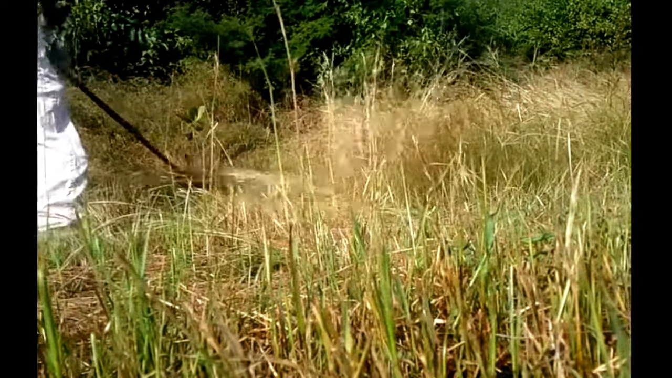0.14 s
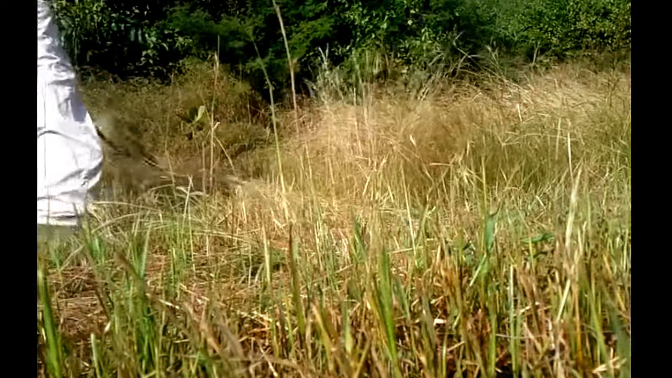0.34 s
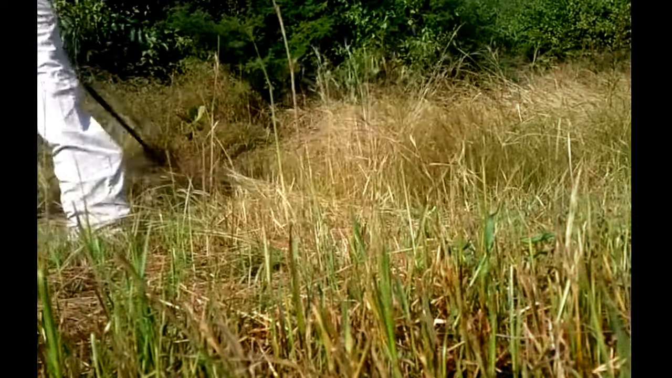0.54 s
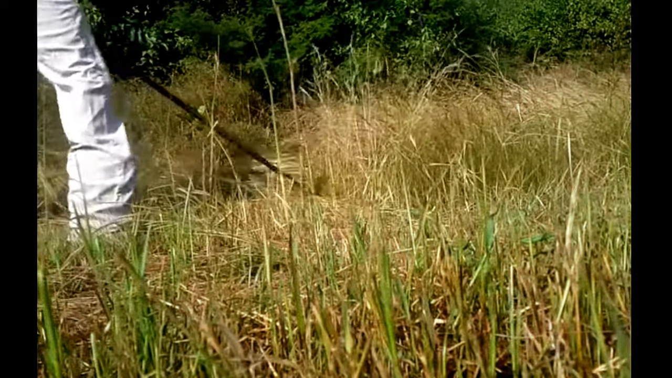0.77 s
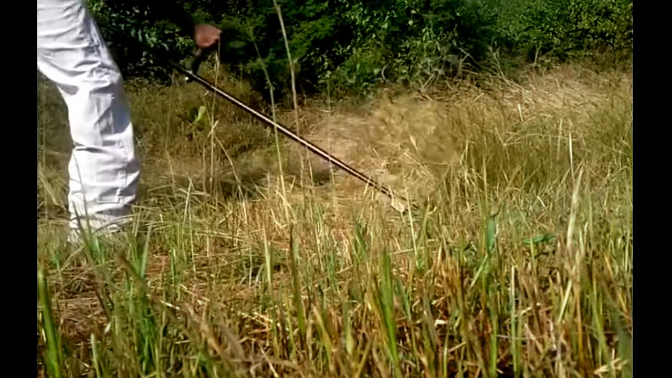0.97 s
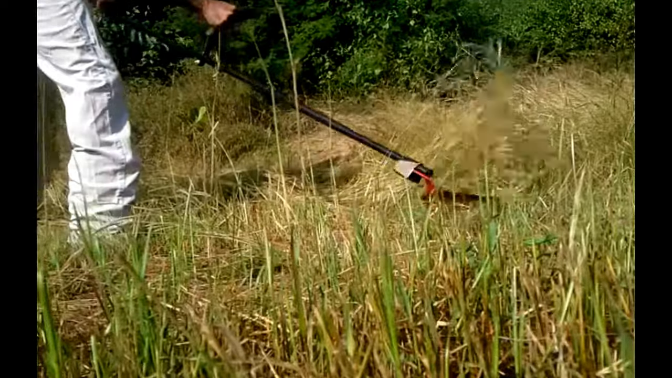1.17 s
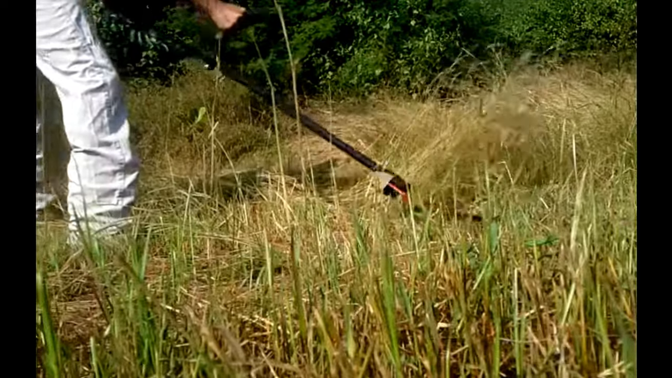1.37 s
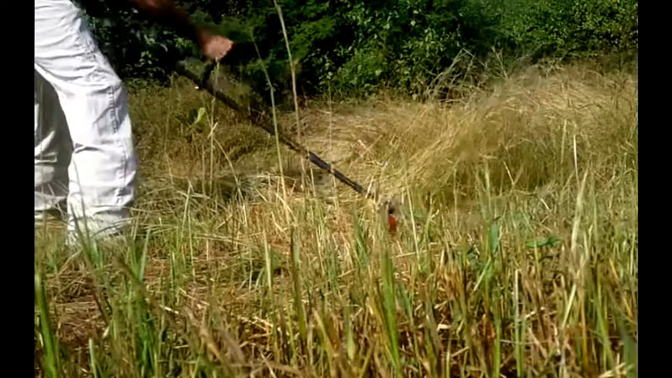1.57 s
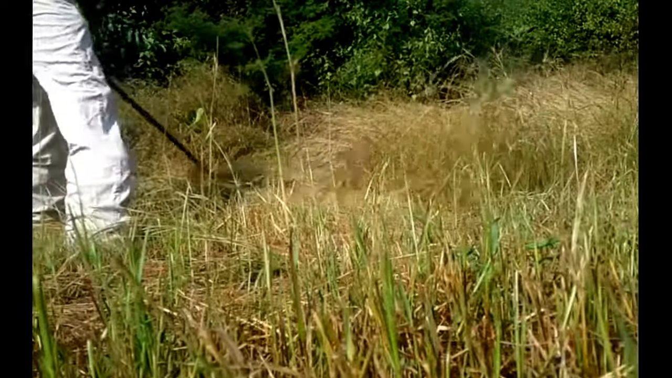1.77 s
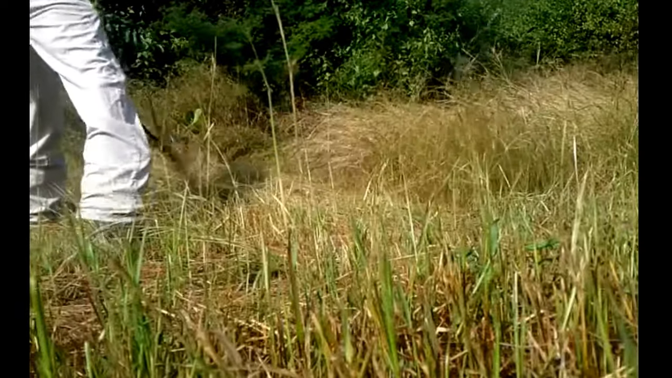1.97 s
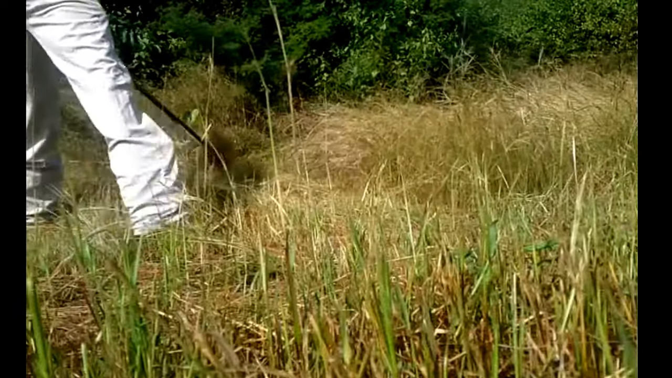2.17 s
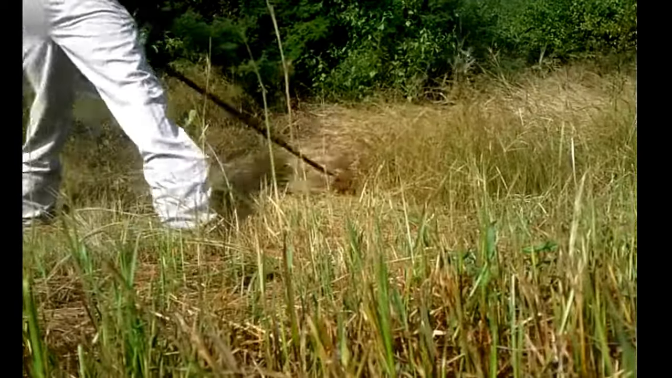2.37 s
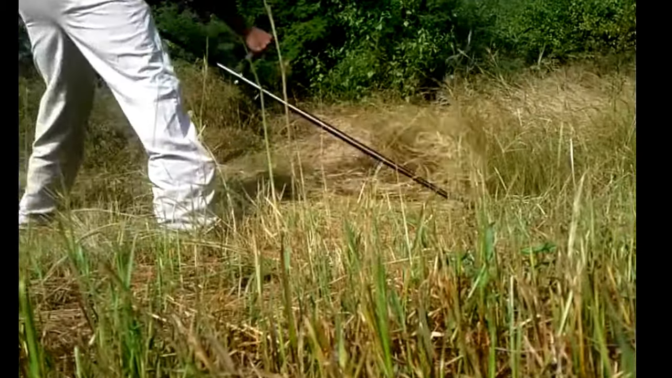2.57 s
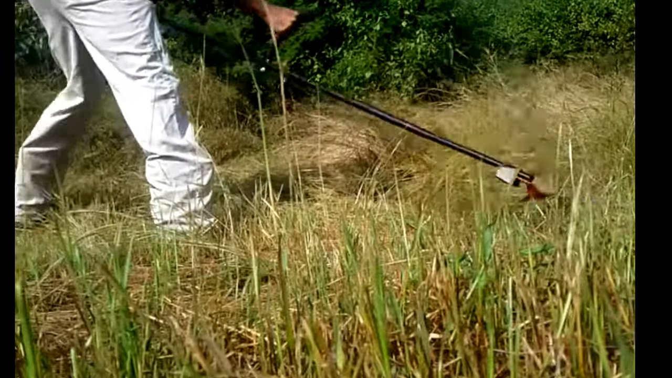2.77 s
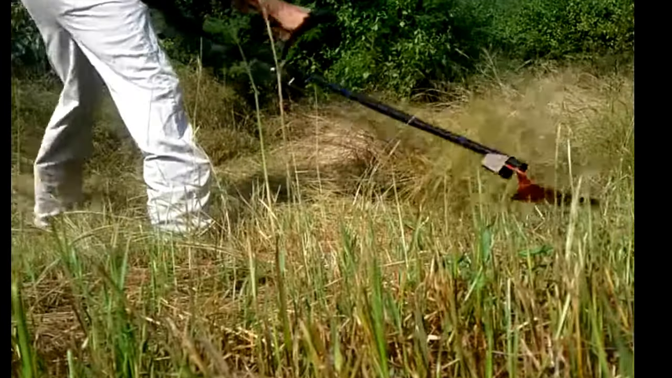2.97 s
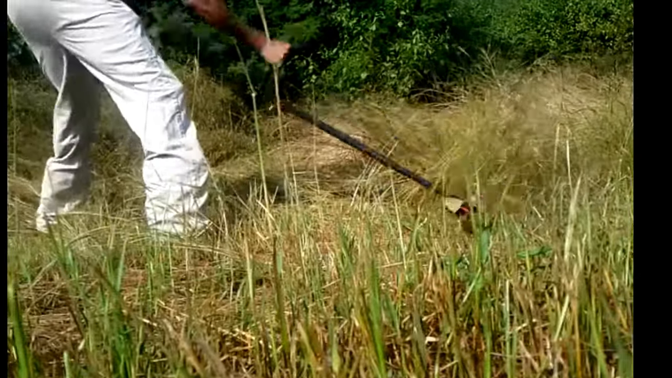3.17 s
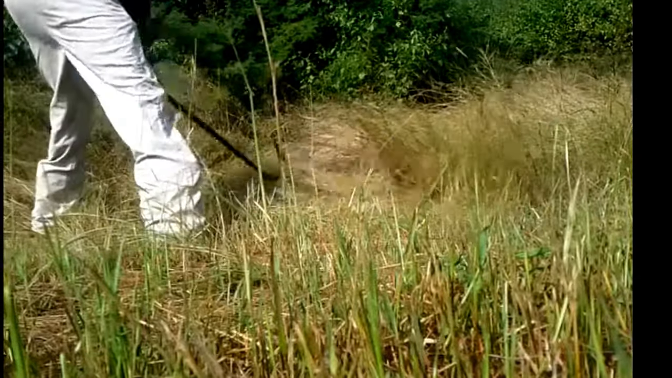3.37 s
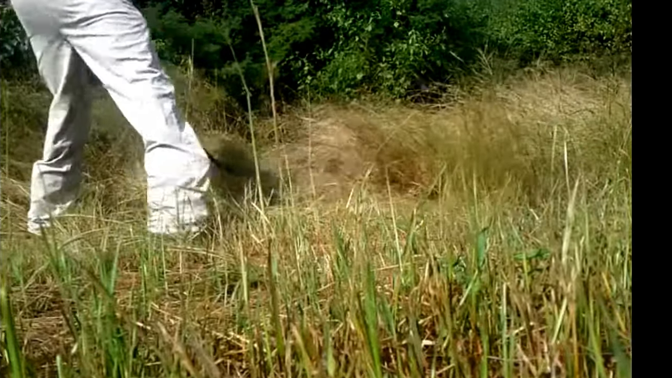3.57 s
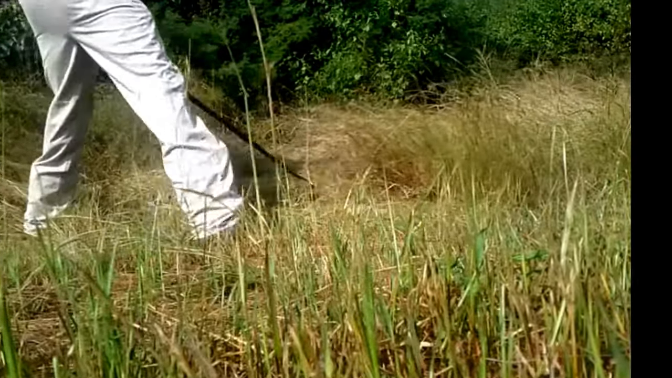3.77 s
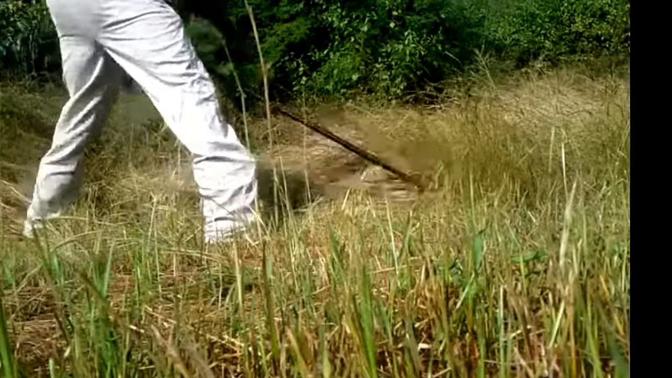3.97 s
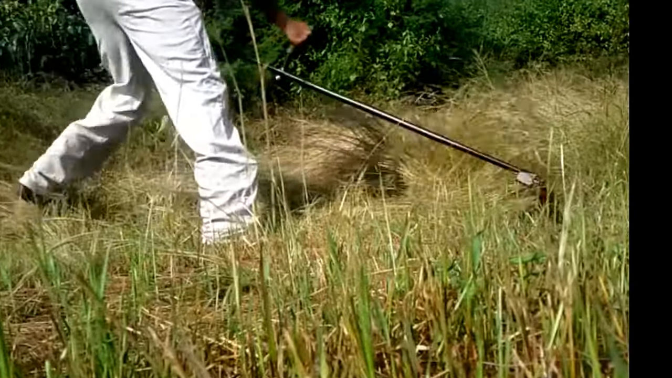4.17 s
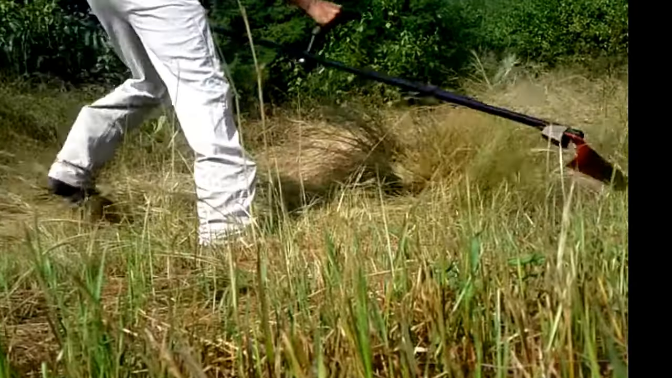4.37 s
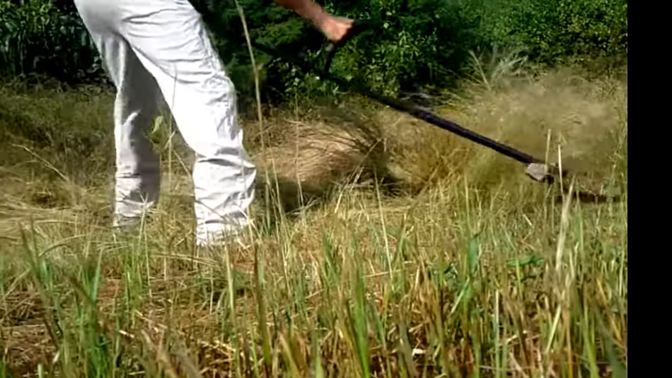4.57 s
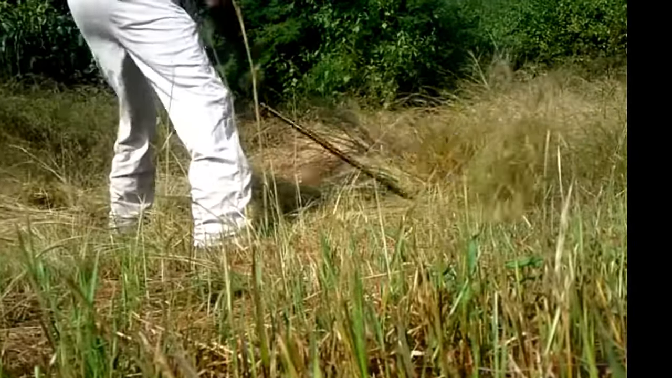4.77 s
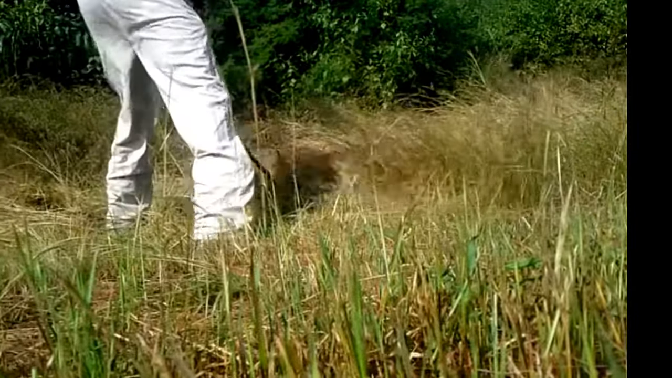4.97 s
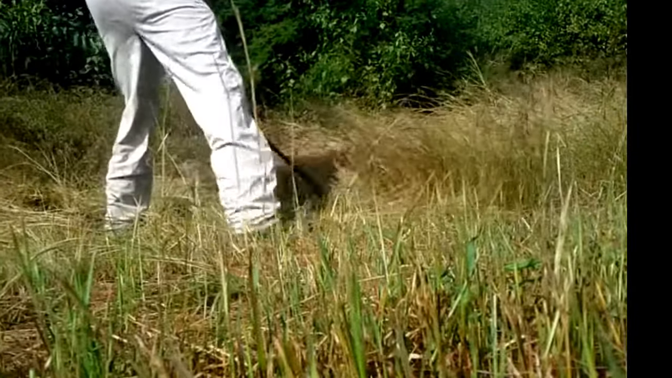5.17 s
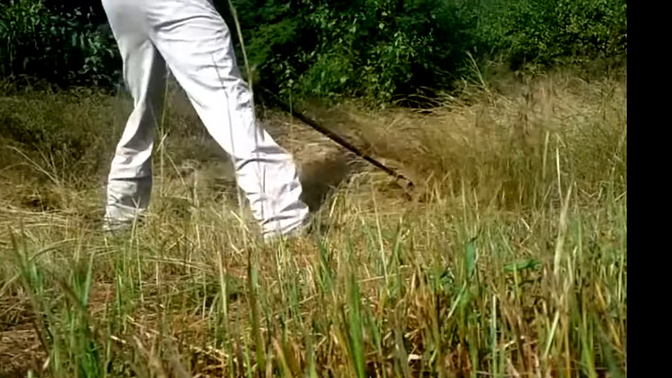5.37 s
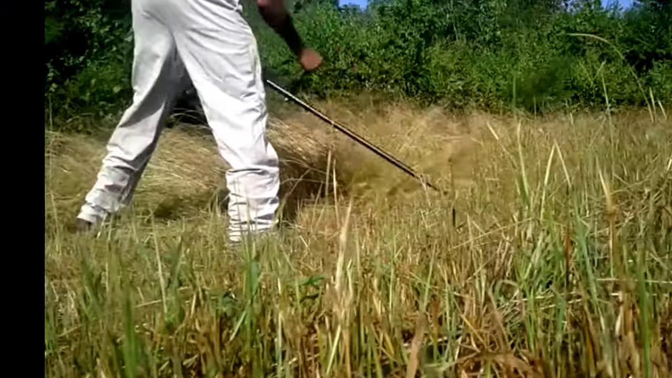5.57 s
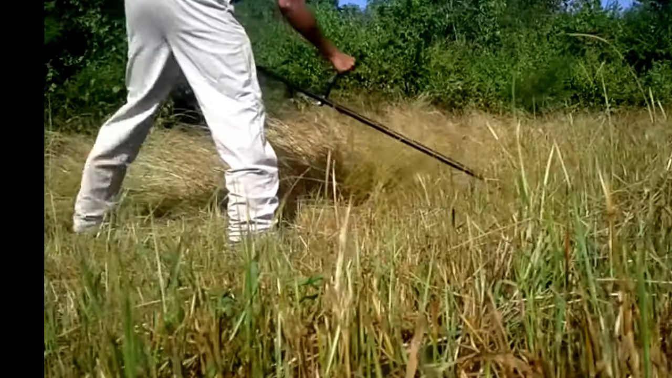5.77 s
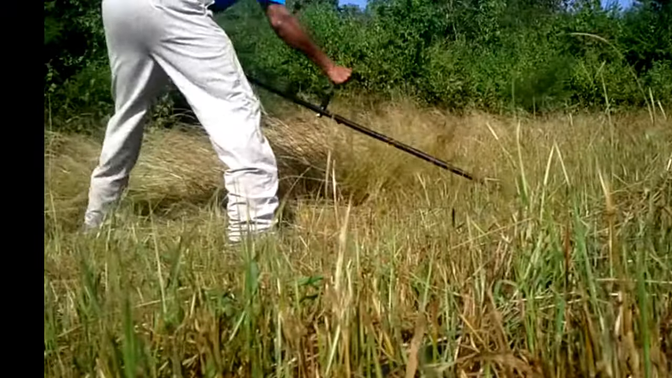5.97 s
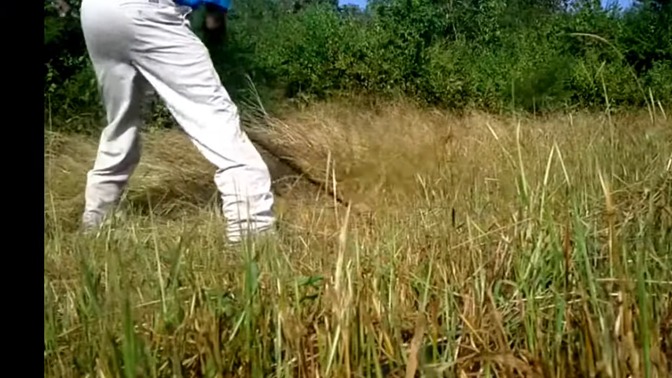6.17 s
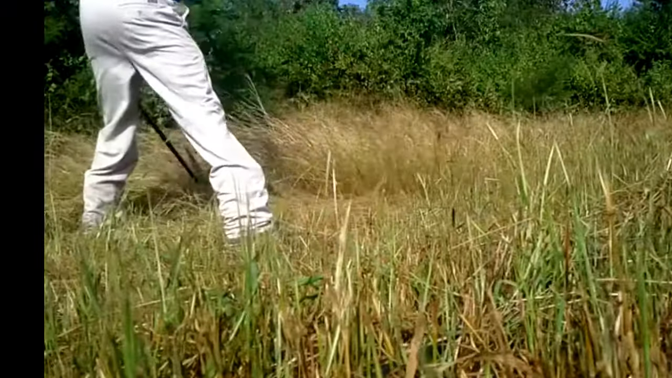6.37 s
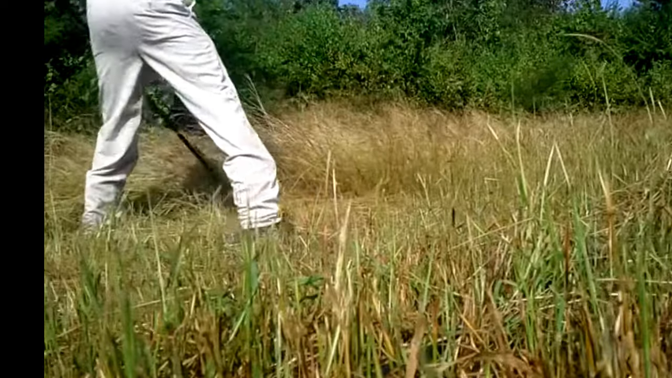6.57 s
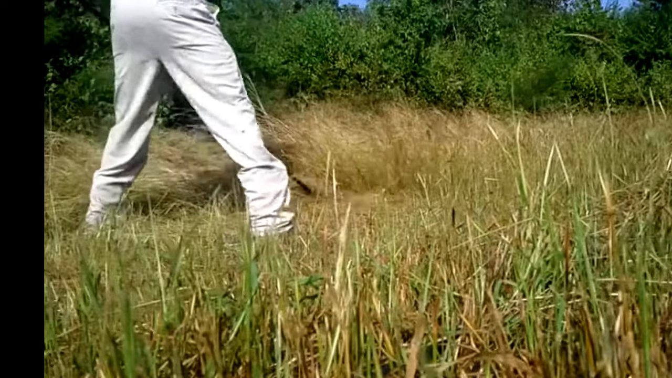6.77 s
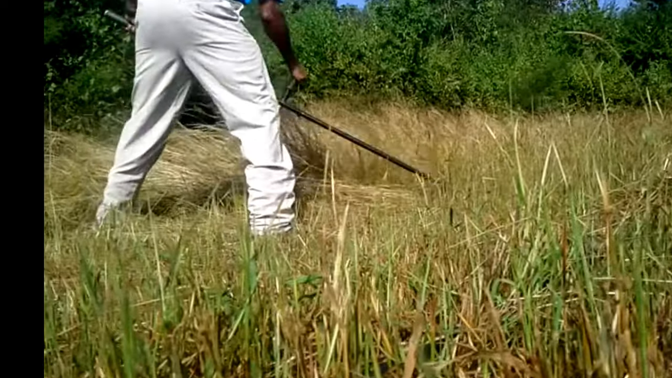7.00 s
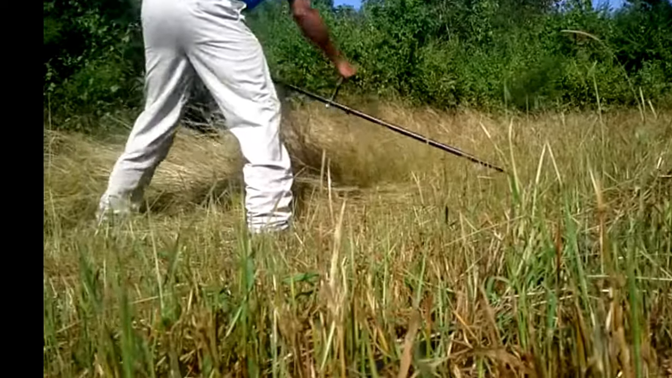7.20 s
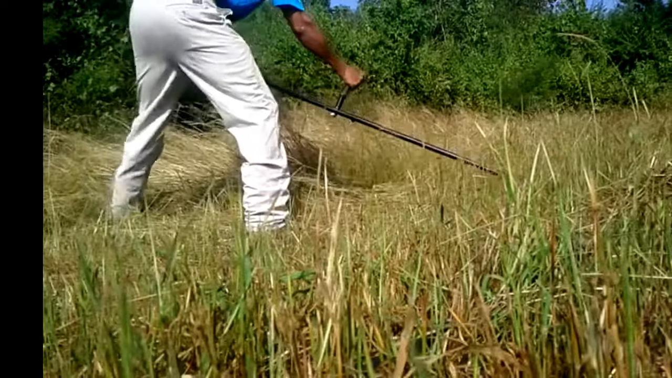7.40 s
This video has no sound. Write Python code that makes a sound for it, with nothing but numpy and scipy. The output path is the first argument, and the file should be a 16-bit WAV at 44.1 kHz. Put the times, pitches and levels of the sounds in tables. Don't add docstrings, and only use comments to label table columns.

```python
import sys
import numpy as np
from scipy import signal
from scipy.fft import rfft, irfft, next_fast_len
from scipy.io import wavfile
from scipy.ndimage import uniform_filter1d, map_coordinates

SR = 44100
rng = np.random.default_rng(int(sys.argv[2]) if len(sys.argv) > 2 else 0)


def unload_audio(sound):
    columns = np.transpose(np.atleast_2d(sound))
    steps = np.round(np.clip(columns, -1, 1) * 32767)
    wavfile.write(sys.argv[1], SR, steps.astype(np.int16))


def volts_from_db(level):
    exponent = np.asarray(level, float) / 20
    return 10 ** exponent


N = 328104
TIME = np.arange(N) / SR
CLOCK = np.arange(0, N / SR + .002, .001)
CHANGE_S = 5.5088


def unit(x):
    return x / np.sqrt(np.mean(x ** 2) + 1e-20)


def wobble(rate):
    knots = rng.standard_normal(N // 100)
    return map_coordinates(knots, [TIME * min(rate, 400)])


def smooth(control):
    return np.interp(TIME, CLOCK, control)


def filtered(x, response):
    m = next_fast_len(len(x) + 8192)
    return irfft(rfft(x, m) * response(np.fft.rfftfreq(m, 1 / SR)), m)[:len(x)]


def coloured(x, points):
    hz, db = np.transpose(points)
    return unit(filtered(x, lambda f: volts_from_db(np.interp(np.log(f + 1), np.log(hz + 1), db))))


def resonance(f, hz, width):
    return 1j * f * width / (hz * hz - f * f + 1j * f * width)


def patchy(x, patchy_db, ring):
    z = signal.stft(x, nperseg=256)[2]
    field = uniform_filter1d(rng.standard_normal(z.shape), 5, 0)
    field = uniform_filter1d(field, 6, 1)
    x = signal.istft(z * volts_from_db(patchy_db * unit(field)), nperseg=256)[1]
    z = signal.stft(x, nperseg=2048)[2]
    return signal.istft(z * np.abs(z) ** ring, nperseg=2048)[1][:N]


def before_after(before, after):
    return np.where(TIME > CHANGE_S, after, before)


# frequency in Hz, level in dB per Hz.
ROAD = [(13, -59), (22, -28), (30, -10), (54, -0.5), (101, 1.5), (124, -0.5), (152, -0.5), (230, -1.5),
        (272, -2), (359, -10), (450, -9.5), (580, -51.5), (990, -120)]
# centre in Hz, width in Hz, level in dB.
ENGINES = [(63.6, 2.6, -68.5), (104.6, 5.3, -73), (149.6, 7.2, -65.5), (184.6, 1.3, -66)]


def road():
    rumble = coloured(patchy(rng.standard_normal(N), patchy_db=0.9, ring=0.22), ROAD)
    tones = np.zeros(N)
    for hz, width, db in ENGINES:
        tone = filtered(rng.standard_normal(N), lambda f: resonance(f, hz, width) ** 2)
        tones += volts_from_db(db + 60) * unit(tone)
    level_db = before_after(-57, -62.5) + 0.3 * wobble(9)
    return volts_from_db(level_db) * (volts_from_db(-.5) * rumble + volts_from_db(-3) * tones)


def cut(bite, crest_db, entry_db, swell, hold, lead_db, lag=0):
    since = CLOCK - bite - lag
    lead = lead_db + 305 * since
    rising = entry_db * np.clip(1 - since / swell, 0, 1) ** 1.69
    after = np.maximum(since - swell, 0)
    held = np.exp(-(after / hold) ** 2.2)
    sag = volts_from_db(-52.5 * after)
    tail = volts_from_db(-5.5 - 116.5 * after)
    falling = 20 * np.log10(held * sag + (1 - held) * tail + 1e-6)
    top_db = np.interp(since, [0, swell, swell + 2 * hold], [-5.5, -2.5, 1.6])
    return np.where(since < 0, lead, rising + falling), top_db


# frequency in Hz, level in dB per Hz.
MEADOW = [(120, -33.5), (200, -8.5), (317, 2.5), (1120, -8), (1280, -6), (1860, -6), (2550, -6.5),
          (6210, -9.5), (7000, -11), (9100, -44), (15400, -120)]


def meadow():
    stir = 0
    for row, swath in zip(CUTS, SWATHS):
        load_db, _ = cut(*row, swath[0])
        stir = stir + volts_from_db(row[1] - 14.5 + load_db)
    hiss = coloured(patchy(rng.standard_normal(N), patchy_db=1.0, ring=0.24), MEADOW)
    level_db = before_after(-52.5, -53) - 3.0 + 0.88 * wobble(2.45)
    return (volts_from_db(level_db) + smooth(stir)) * hiss


def brush(s, rise, fall):
    since = CLOCK - s
    return -8.7 * np.where(since < 0, (since / rise) ** 2, np.abs(since / fall) ** 2.15)


# bite in seconds, crest in dB, bite in dB re crest, swell in seconds, hold in seconds.
CUTS = [
    (0.15, -27, -6, 0.096, .06),
    (1.772, -27, -3.5, 0.11, 0.07),
    (3.403, -27, -7.5, 0.071, 0.087),
    (4.903, -28, -25, 0.078, 0.11),
    (6.258, -34, -22, 0.11, 0.11),
]
# level of the swell up to the bite in dB re crest, turf under the blade in dB,
# turf lag in seconds, stem tips in dB.
SWATHS = [
    (-18.5, -5.5, 0.014, 1.3),
    (-9, -4.5, 0.004, 2),
    (-7.5, -5.5, .015, 0),
    (-24, -4.5, 0.0086, 0.5),
    (-13.5, -2.5, 0.02, 1),
]
# peak in seconds, level in dB, rise in seconds, fall in seconds, tips in dB.
BRUSHES = [(0.72, -58.5, .1, .2, 2.5), (1.15, -47.5, 0.08, 0.12, 0), (1.27, -52, 0.036, 0.083, -1),
           (1.485, -50.5, 0.04, 0.022, -16), (2.4, -56.5, .04, .04, -1), (2.56, -56.5, 0.041, 0.054, 1.5),
           (2.79, -47.5, 0.14, 0.12, -0.5), (3.17, -59, 0.048, 0.044, -13), (3.9, -58, 0.14, 0.093, 3),
           (4.22, -52.5, 0.23, 0.2, 1.2), (4.37, -54.5, .07, 0.088, -1), (4.6, -66, .03, .03, -15),
           (5.48, -56.5, 0.1, 0.075, 5), (5.85, -56.5, 0.047, 0.1, -3.5), (7.06, -53, .24, 0.19, -1)]


def contact():
    rest_db = -66.5 + 2.5 * wobble(14)[::SR // 1000][:len(CLOCK)]
    parts = [(rest_db, -62.0, rest_db + 1.0)]
    for row, (lead_db, turf_db, lag, tips_db) in zip(CUTS, SWATHS):
        crest_db = row[1]
        load_db, top_db = cut(*row, lead_db)
        turf_load_db, _ = cut(*row, lead_db, lag)
        scrape_db = turf_db + 1.41 * turf_load_db
        parts.append((crest_db + load_db, crest_db + scrape_db, crest_db + load_db + top_db + tips_db))
    lead_s = 0.028
    for s, db, rise, fall, top_db in BRUSHES:
        level_db = db + brush(s, rise, fall)
        fizz_db = db + top_db + brush(s - lead_s, 1.27 * rise, fall + lead_s)
        parts.append((level_db, level_db - 10, fizz_db))
    layers = []
    for layer in zip(*parts):
        power = sum(volts_from_db(2 * layer_db) for layer_db in layer)
        layers.append(smooth(np.sqrt(power)))
    hiss, scrape, fizz = layers
    return hiss, scrape, fizz / hiss


def crackle(share, spread_db, clump_db):
    size_db = np.minimum(spread_db * rng.exponential(size=N), 9)
    breaks = (rng.random(N) < share) * volts_from_db(size_db) * rng.choice([-1, 1], N)
    rubbing = unit(breaks) + 1.2 * rng.standard_normal(N)
    return rubbing * volts_from_db(clump_db * wobble(45) + 0.43 * clump_db * wobble(180))


# frequency in Hz, level in dB per Hz.
STEMS = [(530, -20), (900, -15.5), (1470, 0.5), (1610, -3), (2480, 0), (4840, -4), (6590, -6.5),
         (7000, -13.5), (9100, -49.5), (15400, -120)]
# frequency in Hz, level in dB per Hz.
SCRAPE = [(71, -31.5), (120, -15), (225, -10), (431, -3), (518, 0), (1470, -4.5), (1600, -11), (2080, -45),
          (3520, -120)]
# centre in Hz, width in Hz, level in dB.
SINGING = [(805, 29, 3.5), (1080, 7.2, -9.5), (1416, 45, -24.5), (2700, 180, -4), (4270, 68, -1.5),
           (5000, 110, 0)]


def grass():
    hiss, scrape, top = contact()
    stems = crackle(.08, spread_db=1.5, clump_db=0.5)
    stems = coloured(patchy(stems, patchy_db=0.86, ring=0.45), STEMS)
    tips = filtered(stems, lambda f: 1 / (1 + (4200 / (f + 1)) ** 8))
    stems = stems + (top * volts_from_db(4.0) - 1) * tips
    turf = crackle(.05, spread_db=6.5, clump_db=0.47)
    turf = coloured(patchy(turf, patchy_db=0.52, ring=0.42), SCRAPE)
    rubbing = volts_from_db(0.5) * hiss * stems + scrape * turf

    def steel(f):
        return 1 + sum(volts_from_db(db - 15) * resonance(f, hz, width) for hz, width, db in SINGING)

    return filtered(rubbing, steel)


def bursts(rows, turns, length):
    out, t = np.zeros(N + 4096), np.arange(4096) / SR
    for s, db, hz in rows:
        puff = rng.standard_normal(len(t)) * volts_from_db(-60 * t / length)
        puff = filtered(puff, lambda f: resonance(f, hz, hz / turns))
        out[round(s * SR):][:len(t)] += volts_from_db(db) * puff / np.abs(puff).max()
    return out[:N]


# start in seconds, peak in dB, centre in Hz.
SNAPS = [
    (0.0424, -46, 3420),
    (0.075, -48, 3430),
    (1.05, -40, 6130),
    (1.4794, -40, 2310),
    (2.1482, -27.5, 5900),
    (2.1485, -31, 4630),
    (2.3965, -41, 3270),
    (3.8085, -38.5, 2710),
    (5.253, -43, 2390),
    (5.796, -41, 3400),
]


def snaps():
    return bursts(SNAPS, turns=5, length=0.0078)


# start in seconds, peak in dB, centre in Hz.
THUDS = [(0.107, -45, 444), (2.133, -44, 308), (2.367, -51, 221), (2.939, -42, 440), (3.23, -38, 205),
         (3.84, -43.5, 239), (4.048, -38, 307), (4.75, -38.5, 407), (4.776, -33.5, 410), (4.798, -39, 486),
         (4.815, -43, 694), (5.368, -53, 262), (6.258, -38, 284), (6.751, -59.5, 361)]


def thuds():
    return bursts(THUDS, turns=2.6, length=0.097)


# start in seconds, peak in dB, centre in Hz, spread as a share of the centre, length in seconds.
KNOCKS = [(0.138, -19.5, 4930, .12, 0.0078), (0.1365, -20, 6800, 0.08, .012),
          (0.155, -12, 4870, .16, 0.011), (1.75, -20, 2600, 1.3, 0.037), (1.777, -4, 2600, 0.92, 0.017),
          (1.783, -12, 4950, 0.23, 0.014), (3.406, -9, 3820, 0.27, 0.015), (3.4078, -4, 5800, 0.45, 0.0044),
          (3.446, -19, 2700, 0.93, 0.012), (4.893, -30, 5460, .9, 0.029), (6.257, -30.5, 4270, 0.4, 0.057),
          (6.36, -25.5, 2580, 0.13, 0.04), (6.38, -27, 1340, 0.23, 0.071), (6.385, -24, 520, 0.43, 0.064)]
# centre in Hz, width in Hz, level in dB.
STEEL = [(1460, 39, -25.5), (2170, 200, 5.5), (2503, 17, 8.5), (2770, 60, 9), (3300, 11, -1),
         (3430, 40, 7.5), (5180, 28, -13), (5900, 100, -9.5), (6540, 27, -44)]


def knocks():
    out, t = np.zeros(N + 8192), np.arange(8192) / SR

    def modes(f):
        total = 0.86
        for k, (hz, width, db) in enumerate(STEEL):
            total = total + (-1) ** k * volts_from_db(db + 1.5) * resonance(f, hz, width)
        return total

    for s, db, hz, spread, length in KNOCKS:
        rise = 1 - np.exp(-t / (.09 * length))
        push = rise * np.exp(-(t / length) ** 2.0)

        def struck(f):
            thump = 0.63 * resonance(f, 1500, 4500)
            return modes(f) * (spread * thump + resonance(f, hz, 1.7 * spread * hz) ** 2)

        ring = filtered(rng.standard_normal(len(t)) * push, struck)
        out[round((s - .0012) * SR):][:len(t)] += volts_from_db(db - 2.5) * ring / np.abs(ring).max()
    return out[:N]


def scene():
    return (road() + meadow() + grass() + snaps() + thuds() + knocks())[None]


# start in seconds, end in seconds.
STARVED = [
    (.092, .128),
    (1.752, 1.774),
    (3.352, 3.392),
]


def starve(x):
    hz, t, z = signal.stft(x, SR, nperseg=512, noverlap=384)
    dropped = rng.random((len(hz), len(t))) < .5
    dropped = dropped[np.ix_(np.arange(len(hz)) // 5, np.arange(len(t)) // 3)]
    when = sum((t > a) & (t < b) for a, b in STARVED)
    loss = .93 * dropped * when * (hz[:, None] > 2000)
    return signal.istft(z * (1 - loss), SR, nperseg=512, noverlap=384)[1][:N]


def click(s, db):
    return volts_from_db(db) * (np.arange(N) == round(s * SR))


def top_cut(x):
    return signal.sosfilt(signal.butter(12, 15900, fs=SR, output="sos"), x)


def record(dry):
    def band(f):
        return 1 / (1 + (f / 6960) ** 260) / (1 + (40 / (f + 1)) ** 3)

    narrow = filtered(starve(dry[0]), band)
    since = TIME - CHANGE_S
    fade_in = np.clip((since - .008) / .055, 0, 1)  # gap, then return (s)
    remnant = volts_from_db(-18 - abs(since) / .0004)
    gate = np.where(since < 0, 1, fade_in + remnant)
    ticks = click(CHANGE_S, -46) + click(3.7, -48)
    return top_cut((narrow * gate + ticks)[None])


dry = scene()
out = record(dry)
unload_audio(out)
```